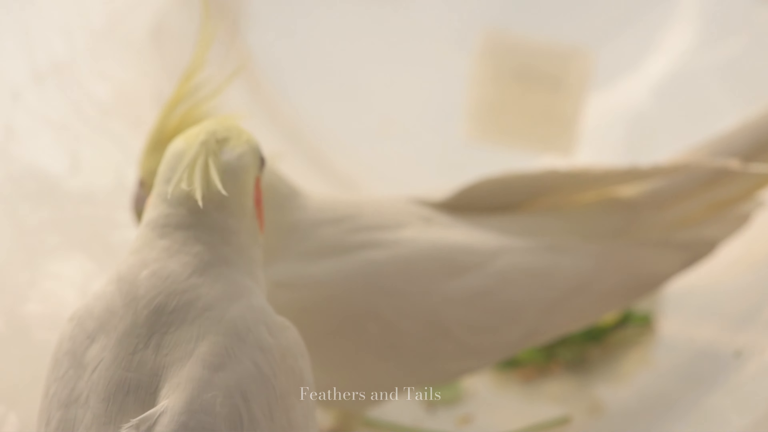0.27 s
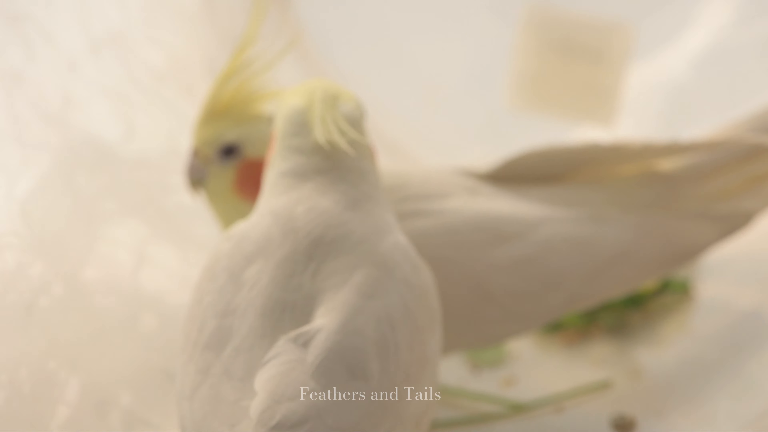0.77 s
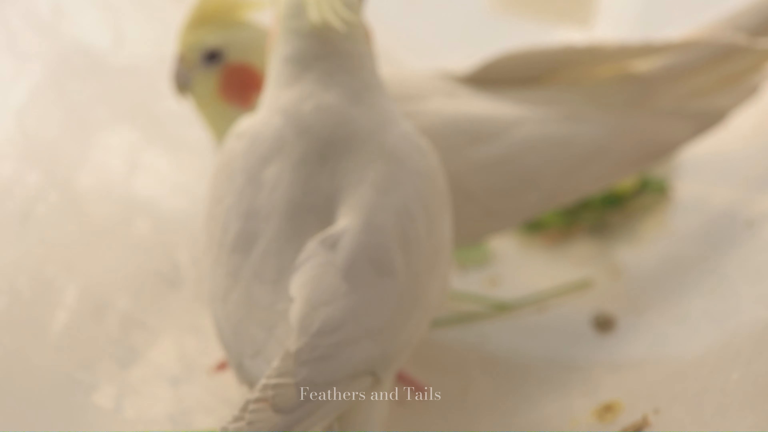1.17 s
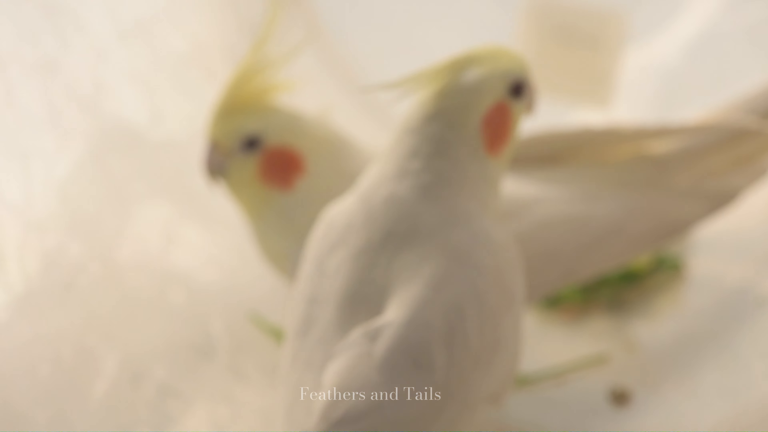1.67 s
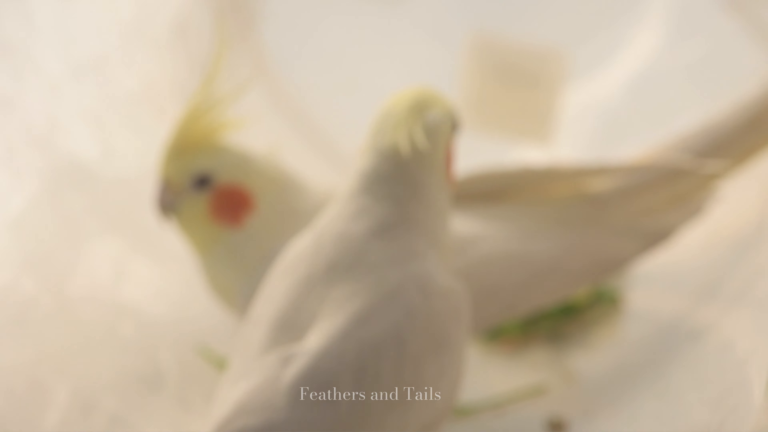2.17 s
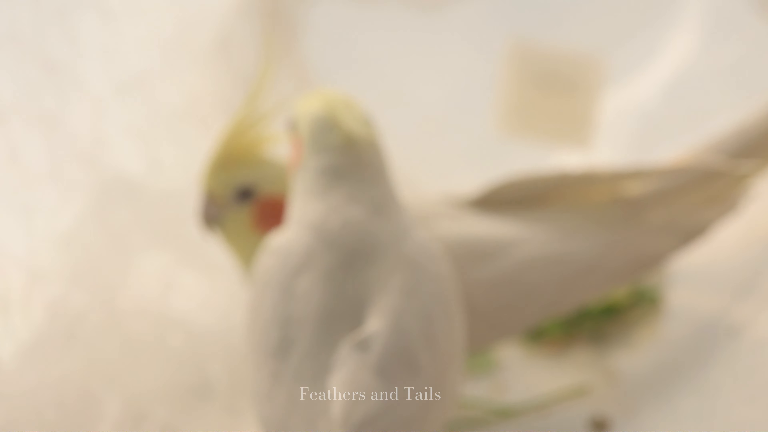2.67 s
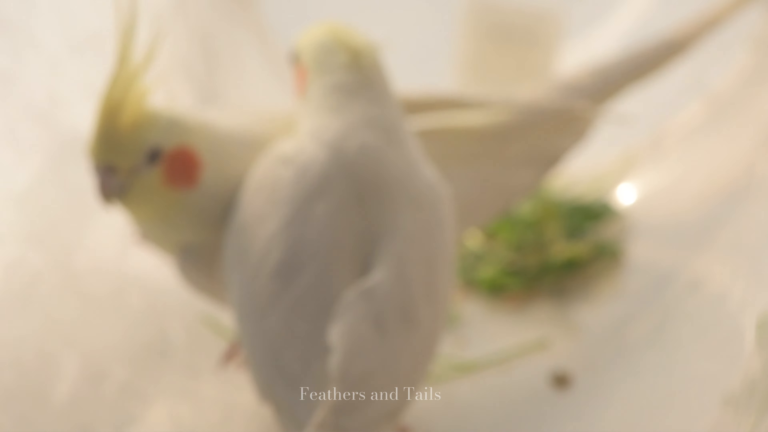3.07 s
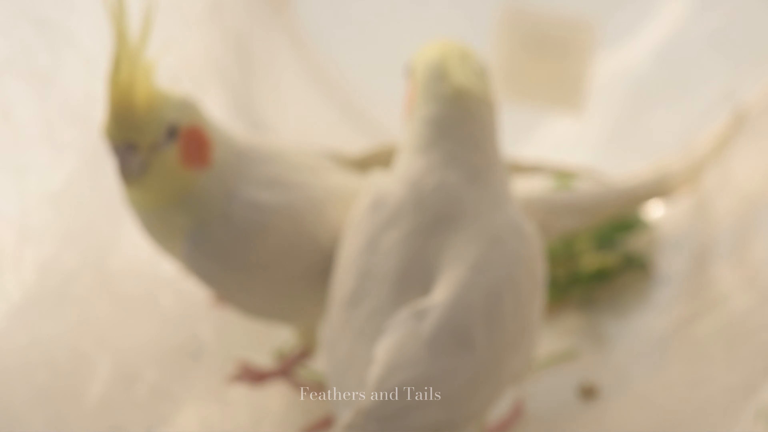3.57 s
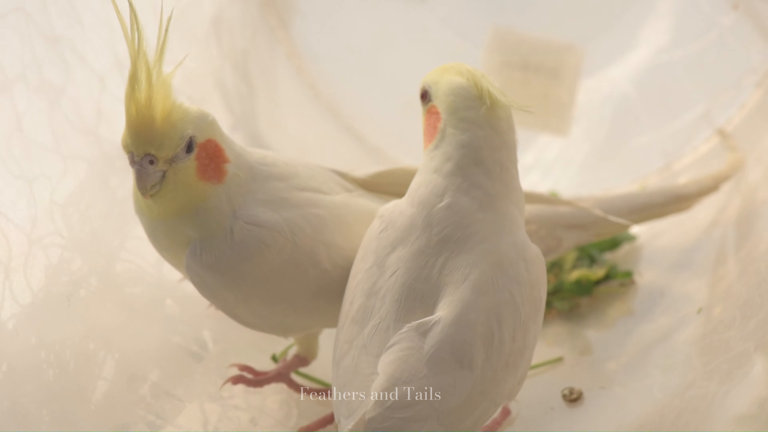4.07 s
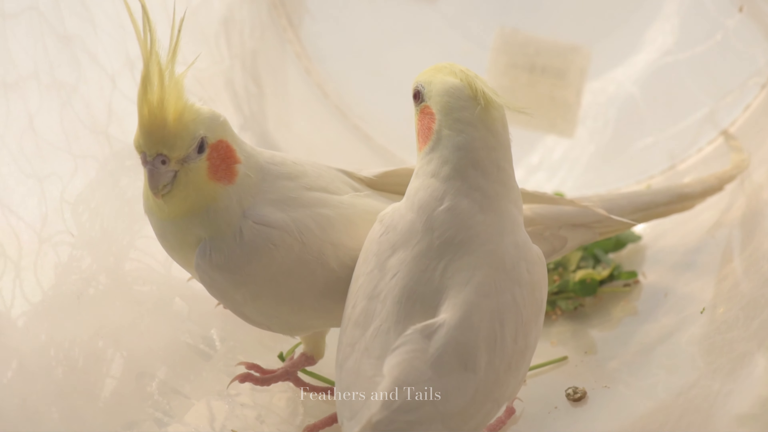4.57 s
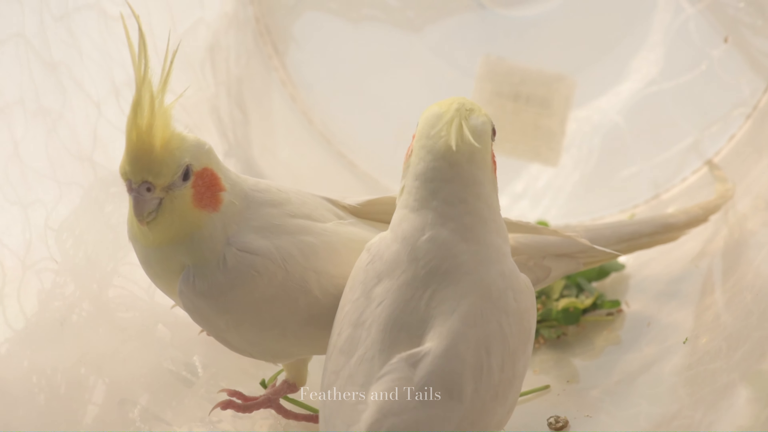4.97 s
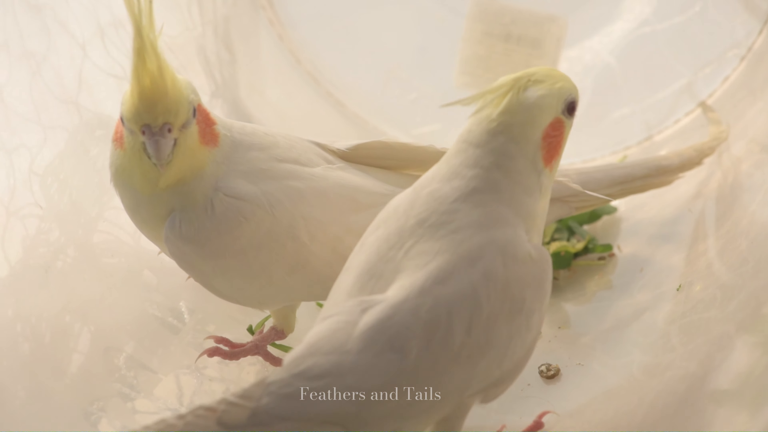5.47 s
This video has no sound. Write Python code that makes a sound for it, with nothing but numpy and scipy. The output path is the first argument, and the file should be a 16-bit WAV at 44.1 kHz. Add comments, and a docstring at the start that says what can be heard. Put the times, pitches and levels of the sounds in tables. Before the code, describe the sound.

Two cockatiels chatter close to a stereo microphone in a small, bare, reverberant enclosure. A jumpy, bending chirp opens at 0.25 seconds, then short calls follow at 0.7 to 1.4, among them a rough squawk near 1.1 rising into a bright cry. From 1.5 to 2.5 come falling whistles, a clear held whistle around 1.95 and a high one at 2.4. Lower clipped chirps and raspy squawks crowd 2.5 to 3.3, followed by rapid warbles at 3.35 and 3.65, ending with a chirp at 3.8. Small scratchy rasps slip between calls. A lull follows, with faint claw ticks at 3.85 and 4.7 to 5.25 and a very weak, breathy squeak at 4.65. A rising then dropping whistle sounds at 5.3, and a short chirp at 5.7. Soft ventilation noise and low hum persist throughout; a faint deep rumble swells around 0.6.

```python
"""Two chattering cockatiels

Two pet birds call in a small bare enclosure close to a stereo recorder: whistled chirps, warbles and raspy
squawks, each a stack of gliding partials with breath noise. Scratchy rasps are bands of grainy noise,
claw ticks are short scrapes that ring the floor, and the walls answer every sound with a tail of noise.
Ventilation noise, steady hums and one low rumble lie below, and gain control ducks the loudest notes."""
import sys
import numpy as np
from scipy import signal
from scipy.fft import rfft, irfft, next_fast_len
from scipy.io import wavfile
from scipy.ndimage import uniform_filter1d, map_coordinates

SR = 44100
rng = np.random.default_rng(int(sys.argv[2]) if len(sys.argv) > 2 else 0)


def ratio(d):
    """dB to gain"""
    e = np.asarray(d, float) / 20
    return 10 ** e


def inscribe(sig):
    """Save sig as 16-bit PCM at rate SR to the path in sys.argv[1].

    A 1-D sig is mono; a 2-D sig holds one channel per row.
    Samples are clipped to [-1, 1] before scaling.
    """
    pcm = np.round(np.clip(np.atleast_2d(sig).T, -1, 1) * 32767)
    wavfile.write(sys.argv[1], SR, pcm.astype(np.int16))


N = 252252  # length in samples


def unit(x):
    """Scales x to rms 1."""
    return x / np.sqrt(np.mean(x ** 2) + 1e-20)


def along(points, hz):
    """Reads a curve of (Hz, value) points on a logarithmic frequency axis."""
    f, v = np.transpose(points)
    return np.interp(np.log(hz + 1), np.log(f + 1), v)


def wobble(n, rate_hz):
    """A smooth random curve of n samples, with rate_hz random points a second."""
    points = rng.standard_normal(int(n * rate_hz / SR) + 4)
    return map_coordinates(points, [np.arange(n) * rate_hz / SR])


def filtered(x, response):
    """Filters x by multiplying its spectrum with a response of frequency."""
    n = x.shape[-1]
    size = next_fast_len(n + 4096)
    return irfft(rfft(x, size) * response(np.fft.rfftfreq(size, 1 / SR)), size)[..., :n]


def add(track, x, s):
    """Mixes x into the track from time s in seconds."""
    part = track[:, round(s * SR):][:, :x.shape[-1]]
    part += x[..., :part.shape[1]]


# Plain notes, one straight glide each. Each row: start in seconds, length in seconds, first pitch in Hz,
# last pitch in Hz, starting level in dB, change of level in dB.
PLAIN_NOTES = [(.719, 0.029, 1243, 1120, -20.5, -6), (2.321, 0.035, 2017, 2520, -24, -5.5),
               (2.792, 0.032, 1492, 1398, -10, -8), (5.47, 0.052, 1275, 1337, -19.5, -8.5)]
# Bent calls, pitch and level drawn through several points, one list each. Each row: time in seconds,
# middle pitch in Hz, basic level in dB (first and second partial together).
BENT_CALLS = [
    [(.234, 2010, -29), (.244, 1895, -22), (.25, 2740, -17.5), (.255, 2897, -11), (.263, 2400, -14),
     (.274, 1985, -10.5), (.29, 2387, -10.5), (.301, 2190, -12.5), (.31, 1728, -16.5), (.317, 1993, -12.5),
     (.331, 2022, -10.5), (.337, 1788, -31), (.35, 1500, -23), (.362, 1674, -28.5), (.372, 1340, -19.5),
     (.39, 1305, -21.5), (.408, 1107, -23)],
    [(.804, 1155, -25), (.83, 1136, -21), (.855, 1270, -25.5), (.868, 1330, -15)],
    [(.931, 1720, -18), (.94, 1880, -11.5), (.952, 2294, -14), (.96, 2020, -16)],
    [(1.014, 1743, -10.5), (1.04, 1797, -25.5), (1.085, 2008, -13.5), (1.148, 2131, -13),
     (1.157, 2523, -15), (1.165, 2300, -7)],
    [(1.223, 2095, -7), (1.231, 1850, -14.5), (1.244, 2552, -8.5), (1.265, 2382, -12.5), (1.28, 1648, -17),
     (1.3, 1770, -20.5), (1.312, 1330, -20.5), (1.324, 1715, -30), (1.338, 1865, -14.5),
     (1.362, 1715, -9.5), (1.37, 1220, -21)],
    [(1.468, 2620, -13.5), (1.486, 2226, -10.5), (1.5, 1660, -15.5), (1.522, 1038, -27)],
    [(1.612, 3430, -39), (1.625, 3210, -17.5), (1.648, 2793, -12.5), (1.658, 2810, -20)],
    [(1.752, 1170, -28.5), (1.765, 1252, -15), (1.782, 1530, -18), (1.79, 1546, -27), (1.805, 1666, -19.5),
     (1.822, 1305, -22.5), (1.845, 1339, -20.5), (1.865, 1800, -40)],
    [(1.89, 2030, -30), (1.903, 2345, -16.5), (1.914, 2632, -11.5), (1.945, 2594, -9), (1.979, 2612, -8.5),
     (1.985, 2256, -14.5), (1.991, 2585, -20), (2.003, 2610, -14), (2.08, 2620, -35)],
    [(2.186, 2030, -20.5), (2.195, 2168, -12), (2.225, 2067, -10), (2.233, 1957, -12.5), (2.246, 1800, -23)],
    [(2.36, 3140, -28), (2.37, 3125, -33), (2.375, 3014, -16), (2.4, 2844, -7.5), (2.418, 2885, -16),
     (2.432, 2906, -16)],
    [(2.521, 1175, -23.5), (2.55, 1473, -16), (2.6, 1273, -19.5), (2.63, 1407, -20), (2.64, 1503, -11),
     (2.652, 1283, -16)],
    [(2.71, 1430, -28), (2.719, 1359, -15.5), (2.727, 1506, -9.5), (2.736, 1370, -32)],
    [(2.888, 1272, -21.5), (2.94, 1330, -18.5), (2.95, 1470, -22)],
    [(3.013, 1750, -14.5), (3.022, 1726, -12), (3.034, 2174, -10), (3.04, 1770, -25)],
    [(3.096, 1769, -11.5), (3.118, 1656, -20.5), (3.135, 1774, -17), (3.165, 1959, -10.5),
     (3.195, 1948, -10.5), (3.215, 1760, -11.5), (3.227, 1685, -15)],
    [(3.292, 1285, -27.5), (3.305, 1327, -24.5), (3.313, 1446, -14.5), (3.321, 1410, -22)],
    [(3.324, 1548, -9), (3.338, 1778, -13), (3.35, 1613, -21), (3.45, 1666, -19.5), (3.491, 1460, -22),
     (3.502, 1695, -14.5), (3.512, 1698, -11), (3.522, 1600, -17), (3.529, 1217, -16.5)],
    [(3.598, 1282, -36), (3.615, 1343, -14), (3.627, 1277, -22), (3.634, 1367, -9.5), (3.642, 1400, -17),
     (3.66, 1343, -22.5), (3.75, 1313, -25.5), (3.772, 1364, -17), (3.78, 1423, -15.5), (3.791, 1471, -9.5),
     (3.8, 1300, -22.5)],
    [(4.642, 2210, -50), (4.658, 2715, -41.5), (4.69, 2760, -53.5)],
    [(5.28, 1560, -28), (5.295, 1810, -17.5), (5.315, 1903, -18.5), (5.338, 1876, -16.5),
     (5.346, 1934, -35), (5.354, 1968, -17.5), (5.364, 2136, -30.5), (5.39, 2190, -12), (5.4, 2364, -10.5),
     (5.416, 2313, -9), (5.425, 2190, -16.5), (5.437, 1517, -20.5), (5.446, 1030, -26)],
    [(5.65, 1240, -28.5), (5.675, 1466, -24.5), (5.7, 1508, -25), (5.72, 1380, -11.5)],
]


def calls():
    """All bird calls, each placed by the turn of the head and answered by the walls."""
    out = np.zeros((2, N))
    notes = []
    for s, length, first_hz, last_hz, db, change_db in PLAIN_NOTES:
        notes.append([(s, first_hz, db), (s + length, last_hz, db + change_db)])
    for rows in notes + BENT_CALLS:
        start, end = rows[0][0], rows[-1][0]
        pan_db, echo_db = head((start + end) / 2)
        add(out, in_room(chirp(rows, pan_db), echo_db), start)
    return out


def chirp(rows, pan_db):
    """One call: the syrinx sounds a stack of partials on a gliding pitch, with breath and flutter."""
    s, *columns = np.transpose(rows)
    t = np.arange(s[0], s[-1], 1 / SR)
    n = len(t)
    glides = [uniform_filter1d(np.interp(t, s, c), size=120, mode="nearest") for c in columns]
    hz, level_db = np.add(glides, warble(t))
    overtone_db = gape(t)
    # the two lowest partials share the level
    first_db = level_db - 10 * np.log10(1 + ratio(overtone_db[0]) ** 2)
    second_db, third_db = first_db + overtone_db

    depth, hiss, bright, beat, pulse = flutter(t)
    unsteady = 0.0059 * wobble(n, 200.7)
    rough = depth * (0.037 * beat + 0.073 * wobble(n, 598.5))
    hz = hz * (1 + unsteady + rough)
    phase = 2 * np.pi * np.cumsum(hz) / SR

    third = ratio(third_db) * bright * pulse  # the overtones throb deeper than the fundamental
    # a pressed voice moves strength to the higher partials
    sizes = [ratio(first_db), ratio(second_db) / bright, third] + high_partials(third, hz)
    voice = partials(sizes, hz, phase, depth) + off_tones(t)
    breath_size = hiss * np.hypot(ratio(second_db), ratio(first_db - 10.0))
    voice = pulse * (voice + breath_size * breath(phase))
    edges = np.clip(np.minimum((t - s[0]) / 0.0014, (s[-1] - t) / 0.002), 0, 1)
    return voice * edges * ratio(np.array([[.5], [-.5]]) * pan_db)


def partials(sizes, hz, phase, depth):
    """Sums the whole multiples of the pitch in stereo; no partial is quite steady."""
    n = len(phase)
    side = np.array([[.5], [-.5]])
    voice = np.zeros((2, n))
    for k, size in enumerate(sizes, 1):
        # under flutter each partial breaks up into grains of its own
        size = size * ratio(1.95 * wobble(n, 140.9) + 9.7 * depth * wobble(n, 502))
        # the near walls turn the phase differently left and right, more so at high pitch
        turn = rng.choice([-1, 1]) * min(.5 * k * np.mean(hz) / 1500, 1.5)
        # the higher a partial, the more it frays into noise
        blur = .13 * max(k - 2, 0) * wobble(n, 900)
        voice -= np.sqrt(2) * size * np.cos(k * phase + 0.23 * k * k + blur + side * turn)
    return voice


# Average strength of the higher partials. Each row: frequency in Hz, level over the third partial in dB.
BEAK_TONE = [(3000, 10.5), (6200, -9.5), (7800, -12.5), (9600, -15), (12500, -16.5), (15500, -28)]


def high_partials(third, hz):
    """Sizes of partials 4 to 11, shaped by the beak and wavering around its curve."""
    sizes = []
    for k in range(4, 12):
        shape = ratio(along(BEAK_TONE, k * hz) + 5 * wobble(len(hz), 150))
        sizes.append(third * shape * (k * hz < SR / 2))
    return sizes


# Rough moments, the squawks among them. Each row: start in seconds, end in seconds, depth from 0 to 1,
# breath hiss in dB over the low partials' strength, gain in dB of the third partial and up
# (the second loses as much).
ROUGH_MOMENTS = [(0.236, 0.246, 0.25, 6, 0), (1.0435, 1.143, 0.28, -9, 8), (3.119, 3.217, 0.15, -7, 9),
                 (2.551, 2.635, 0.08, -7.5, 1.5), (3.285, 3.304, 0.34, -2, -6),
                 (3.593, 3.626, 0.3, -11.5, 2.5), (2.315, 2.36, 0.33, -10, 7), (4.638, 4.692, 0.5, 6, 4)]


def flutter(t):
    """The syrinx flutters and partly shuts with each throb: depth, hiss, brightness, beat, pulse."""
    throb_hz, closed_share = 92, .12
    closing_per_depth, most_closed = 3.4, .85
    n = len(t)
    depth, hiss, bright = np.zeros(n), np.full(n, ratio(-21)), np.ones(n)
    throbs = np.zeros(n)
    for start, end, deep, hiss_db, bright_db in ROUGH_MOMENTS:
        inside = (t > start) & (t < end)
        depth[inside] = np.clip(deep, 0, 1)
        hiss[inside], bright[inside] = ratio(hiss_db), ratio(bright_db)
        throbs[inside] = (t[inside] - start) * throb_hz
    throbs += .06 * wobble(n, 60)  # slightly uneven
    beat = -np.cos(2 * np.pi * throbs)
    shut = np.exp(-((throbs - np.round(throbs)) / closed_share) ** 2)
    closing = np.clip(closing_per_depth * depth, 0, most_closed) * shut
    pulse = (1 + depth * beat / 2) * (1 - closing)
    return depth, hiss, bright, beat, pulse


# Rough tones out of tune with the stack. Each row: start in seconds, end in seconds, first middle pitch in Hz,
# last middle pitch in Hz, average level in dB before the flutter's pulse.
SECOND_VOICE = [(1.068, 1.147, 3400, 3600, -39), (2.571, 2.623, 3430, 3500, -29.5),
                (3.111, 3.215, 4200, 4360, -24.5)]


def off_tones(t):
    """The other half of the syrinx adds a tone of its own, unsteady in pitch and level."""
    n = len(t)
    side = np.array([[.5], [-.5]])
    out = np.zeros((2, n))
    for start, end, first_hz, last_hz, db in SECOND_VOICE:
        hz = np.interp(t, [start, end], [first_hz, last_hz]) * (1 + .025 * wobble(n, 300))
        fade = np.clip(np.minimum(t - start, end - t) / 0.0087, 0, 1)
        size = fade * ratio(db + 4 * wobble(n, 300))
        out += np.sqrt(2) * size * np.cos(2 * np.pi * np.cumsum(hz) / SR + side)
    return out


# Colour of the breath hiss. Each row: frequency in Hz, relative level in dB per Hz.
BREATH_COLOUR = [(900, -23), (1500, -6.5), (4000, -1), (7000, -17), (9500, -6.5), (12000, -32),
                 (15500, -37)]


def breath(phase):
    """Hiss of the syrinx at rms 1: air escapes once in each cycle of the pitch."""
    n = len(phase)
    gate = 1 + np.cos(phase)
    air = gate * (rng.standard_normal(n) + 0.93 * rng.standard_normal((2, n)))
    return unit(filtered(air, lambda hz: ratio(along(BREATH_COLOUR, hz))))


# Warbled stretches. Each row: first crest in seconds, end in seconds, pitch swing to either side in Hz,
# swings a second at the first crest, swings a second once settled.
WARBLED = [(3.338, 3.488, 224, 43.5, 32.47), (3.641, 3.766, 148, 40.4, 31.1)]


def warble(t):
    """Pitch swing in Hz and level swing in dB: the rate slows down, the swing fades in and out."""
    settle_s, fade_s = 0.0362, 0.0139
    turn_db, uneven_db = 3, 3
    hz, db = np.zeros(len(t)), np.zeros(len(t))
    for crest, end, swing_hz, first_hz, settled_hz in WARBLED:
        u = t - crest
        settling = 1 - np.exp(-np.clip(u, -settle_s, None) / settle_s)
        turns = settled_hz * u + (first_hz - settled_hz) * settle_s * settling
        on = np.clip(np.minimum(u / fade_s + 1, (end - t) / fade_s), 0, 1)
        hz += on * swing_hz * np.cos(2 * np.pi * turns)
        db += on * turn_db * np.cos(2 * 2 * np.pi * turns)  # louder at both turning points of the pitch
        db += on * uneven_db * wobble(len(t), 70)
    return hz, db


# Overtone colour of stretches of the calls, mostly with the beak open. Each row: start in seconds,
# end in seconds, second partial over the first in dB, third partial over the first in dB
# (both before any flutter, and never below the shut beak's level).
OVERTONE_COLOUR = [(0.252, 0.268, 0.5, -9), (0.258, 0.284, -3, -8), (.28, 0.323, -6.5, -29),
                   (0.303, 0.318, -5, -1), (0.718, 0.736, -6, -23), (0.857, .875, 3, -15),
                   (.925, 0.954, -3.5, -12), (1.009, 1.04, 7, -5), (1.047, 1.177, 7.5, -2.5),
                   (1.214, 1.245, 10.5, 0.5), (1.343, 1.375, 13, -1), (1.474, 1.506, -10.5, -21),
                   (1.75, 1.793, 7.5, -7.5), (1.936, 2.078, -21, -29.5), (2.18, 2.208, 5.5, -3.5),
                   (2.194, 2.25, -18, -27.5), (2.355, 2.432, -28, -31.5), (2.515, 2.554, 5, -7),
                   (2.577, 2.625, -13, -18.5), (2.632, 2.654, 14.5, -1.5), (2.713, 2.744, 14.5, 3),
                   (2.781, 2.811, 11, -10.5), (2.94, 2.955, 6.5, -9.5), (2.987, 3.045, -8, -17.5),
                   (3.094, 3.125, 12, 0.5), (3.11, 3.24, 5, -8.5), (3.293, 3.32, 10, 9.5),
                   (3.321, 3.34, 6, -15.5), (3.489, 3.536, 5.5, -7), (3.598, 3.647, 9.5, -9),
                   (3.654, 3.774, -14.5, -39), (3.778, 3.803, 12, -8.5), (5.275, 5.416, -23, -18.5),
                   (5.434, 5.455, -0.5, -16), (5.45, 5.514, -4.5, -23), (5.646, 5.703, -22, -22),
                   (5.701, 5.725, 20, 0)]


def gape(t):
    """Second and third partial over the first, in dB: an opening beak lets more overtones out."""
    shut_db, change_s = np.array([[-27.0], [-27.0]]), 0.0087
    db = shut_db + 0 * t
    for start, end, *colour_db in OVERTONE_COLOUR:
        # halfway there at start and end
        share = np.clip(np.minimum(t - start, end - t) / change_s + .5, 0, 1)
        db = np.maximum(db, shut_db + (np.c_[colour_db] - shut_db) * share)
    return db


# The heads turn to a side and away to the walls. Each row: time in seconds, left minus right in dB,
# the walls' ringing against the call in dB.
HEAD_TURNS = [(.3, -0.5, -6), (.8, -1.5, -8), (1.1, 0, -2.5), (1.3, -0.5, -4.5), (1.63, 2.5, -7),
              (1.8, 0, -5), (1.95, -0.5, -8.5), (2.2, 0, -6), (2.4, 4, -7), (2.6, 0.5, -8), (2.9, -1, -7),
              (3.15, -2.5, -8.5), (3.35, -1.5, -3), (3.65, -1.5, -9.5), (4.65, -1, -10), (5.3, -4.5, -4),
              (5.68, -0.5, -4)]


def head(s):
    """Left minus right and the walls' share, in dB, gliding between head positions."""
    at, pan_db, echo_db = np.transpose(HEAD_TURNS)
    return np.interp(s, at, pan_db), np.interp(s, at, echo_db)


# Voiceless rasps and rustles. Each row: start in seconds, length in seconds, rms level in dB before the swell,
# centre frequency in Hz, width in octaves (spread of a bell curve).
RASP_BURSTS = [(0.626, 0.035, -30, 2270, 0.86), (1.417, 0.058, -33, 3160, 0.71),
               (1.866, 0.014, -29, 1800, 0.51), (2.242, 0.09, -32.5, 1520, 0.48),
               (2.414, 0.013, -34, 4000, 0.55), (3.447, 0.011, -31.5, 2700, 0.58),
               (3.606, .007, -22, 2600, 0.72), (3.938, 0.013, -48, 9400, 0.3)]


def rasps():
    """Scratchy rasps: grainy noise in one broad band under a soft swell."""
    out = np.zeros((2, N))
    for s, length, db, centre_hz, octaves in RASP_BURSTS:
        n = round(length * SR)
        noise = rng.standard_normal(n) + 0.46 * rng.standard_normal((2, n))
        grains = noise * ratio(0.74 * wobble(n, 465))
        band = filtered(grains, lambda hz: np.exp(-(np.log2((hz + 1) / centre_hz) / octaves) ** 2 / 2))
        swell = np.abs(np.sin(np.pi * np.arange(n) / n)) ** 0.26
        add(out, in_room(ratio(db) * unit(band) * swell, -1.7), s)
    return out


# Claw ticks on the floor. Each row: time in seconds, peak level in dB before the walls answer.
CLAW_TICKS = [(3.8554, -32), (4.6974, -35.5), (5.174, -33), (5.2417, -31), (4.8677, -36), (4.8837, -36),
              (4.899, -37), (4.911, -36), (4.9235, -38)]
# How the floor rings. Each row: frequency in Hz, width in Hz, relative strength in dB.
FLOOR_RINGS = [(1600, 200, 16), (5300, 1300, -1), (8300, 2500, -17)]


def ticks():
    """A claw scrapes for a few milliseconds and rings the floor's resonances briefly."""
    def floor(f):
        return sum(ratio(db) * 1j * f * w / (c * c - f * f + 1j * f * w) for c, w, db in FLOOR_RINGS)

    out, t = np.zeros((2, N)), np.arange(SR // 50) / SR
    fade = ratio(-60 * t / .02) * (1 - np.exp(-t / .0015))
    for s, db in CLAW_TICKS:
        noise = rng.standard_normal(len(t)) + .6 * rng.standard_normal((2, len(t)))
        tick = filtered(noise * fade, floor)
        add(out, in_room(ratio(db) * tick / np.abs(tick).max(), -12), s)
    return out


# How long the walls ring. Each row: frequency in Hz, time to fade by 60 dB in seconds.
WALL_RINGING = [(1000, 0.51), (2600, 0.41), (7000, 0.33), (14000, 0.4)]


def in_room(x, echo_db):
    """Adds the walls' answer, fading noise, with a new tail for each sound since the birds keep moving."""
    hz, t, z = signal.stft(rng.standard_normal((2, SR // 2)), SR, nperseg=256)
    fade = ratio(-60 * t / along(WALL_RINGING, hz)[:, None])
    tail = signal.istft(z * fade, SR, nperseg=256)[1]
    delayed = np.pad(x[0], (round(0.007 * SR), 0))[None]  # 7 ms
    wet = signal.fftconvolve(delayed, tail, axes=1)
    wet *= ratio(echo_db) * np.sqrt(2) / np.linalg.norm(tail)
    return wet + np.pad(x, ((0, 0), (0, wet.shape[1] - x.shape[1])))


# Colour of the ventilation. Each row: frequency in Hz, relative level in dB per Hz.
VENT_COLOUR = [(20, -11), (45, -29), (63, 0.5), (80, -15), (100, 4), (125, -2.5), (165, -4.5), (250, -9),
               (330, -12.5), (640, -11.5), (1200, -15), (2500, -19.5), (5500, -31), (9500, -30.5),
               (13000, -40), (15600, -35)]
# How alike left and right are. Each row: frequency in Hz, likeness from -1 to 1 (held to 0.975 at most).
LIKENESS = [(60, 0.99), (240, 0.94), (950, 0.63), (3770, 0.029), (15000, -0.32)]
# Steady tones, a mains hum and a faint high one. Each row: frequency in Hz, middle rms level in dB.
STEADY_TONES = [(100, -48), (9415, -88)]


def room_air():
    """Ventilation noise, most alike left and right in the bass, with wavering tones and a passing rumble."""
    def turn(hz):
        return np.arccos(np.clip(along(LIKENESS, hz), -1, .975)) / 2

    def mid_and_side(hz):
        return ratio(along(VENT_COLOUR, hz)) * [np.cos(turn(hz)), np.sin(turn(hz))]

    mid, side = filtered(rng.standard_normal((2, N)), mid_and_side)
    air = ratio(-40 + 0.064 * wobble(N, 6.0)) * unit(np.array([mid + side, mid - side]))

    t = np.arange(N) / SR
    hum = np.zeros(N)
    for hz, db in STEADY_TONES:
        tone = np.sin(2 * np.pi * hz * t + 1.05 * wobble(N, 10))
        hum += np.sqrt(2) * ratio(db + 2.2 * wobble(N, 5.22)) * tone

    # a low rumble around 55 Hz swells once
    middle_s, width_s, top_db = 0.63, 0.5, -45
    low = filtered(rng.standard_normal(N), lambda hz: np.exp(-(np.log2((hz + 1) / 55) / .4) ** 2 / 2))
    rumble = ratio(top_db) * np.exp(-((t - middle_s) / width_s) ** 2 / 2) * unit(low)
    return air + hum + rumble


def scene():
    """Birds, rasps and claw ticks over the room."""
    return calls() + rasps() + ticks() + room_air()


def top_cut(x):
    """Nothing passes above the cut-off."""
    return signal.sosfilt(signal.butter(12, 15610, fs=SR, output="sos"), x)


def record(dry):
    """Gain control turns everything down while a loud note is held; the top treble is cut off."""
    threshold_db, cut_per_db, top_hz = -15.0, .4, 15600
    power = np.abs(uniform_filter1d(np.mean(dry ** 2, 0), size=2000))
    level_db = 10 * np.log10(power + 1e-12)
    gain_db = uniform_filter1d(-cut_per_db * np.maximum(level_db - threshold_db, 0), size=800)
    mix = filtered(dry * ratio(gain_db), lambda hz: hz < top_hz)
    return top_cut(mix)


dry = scene()
out = record(dry)
inscribe(out)
```